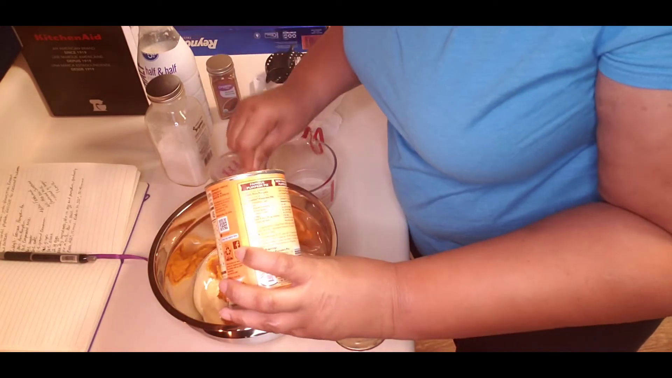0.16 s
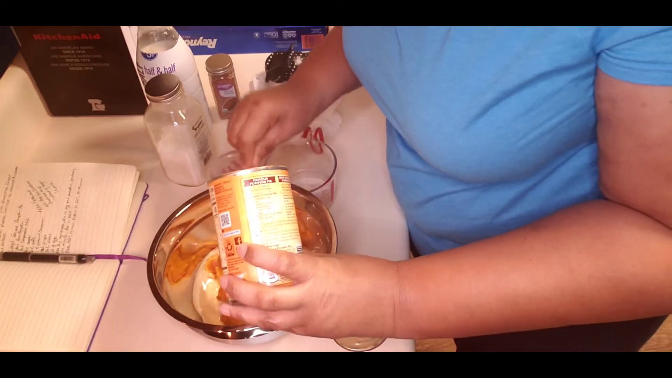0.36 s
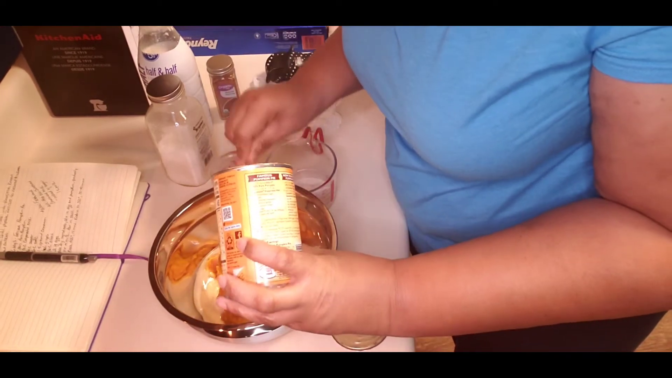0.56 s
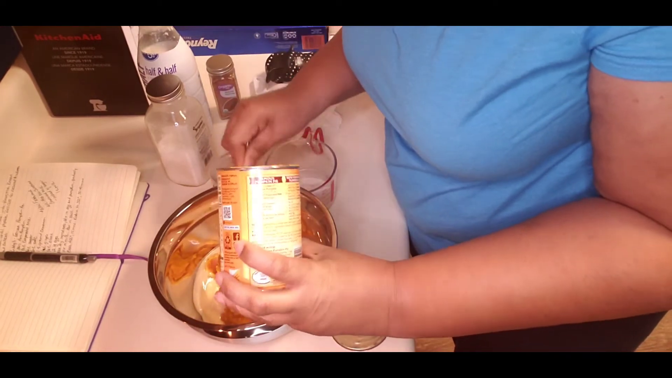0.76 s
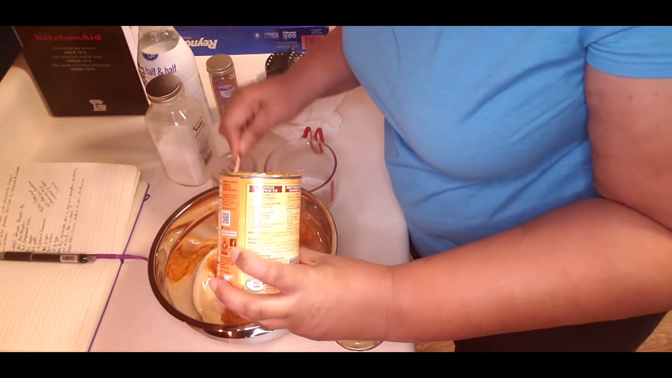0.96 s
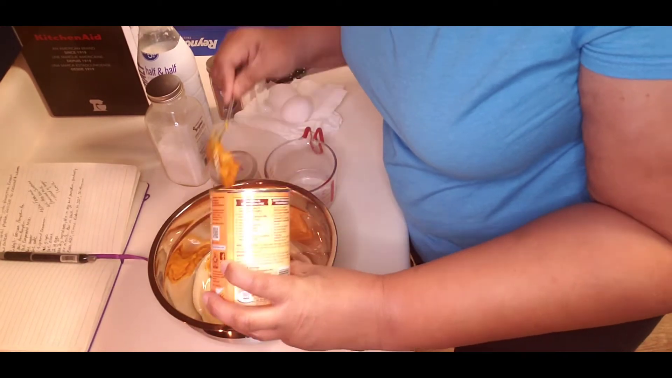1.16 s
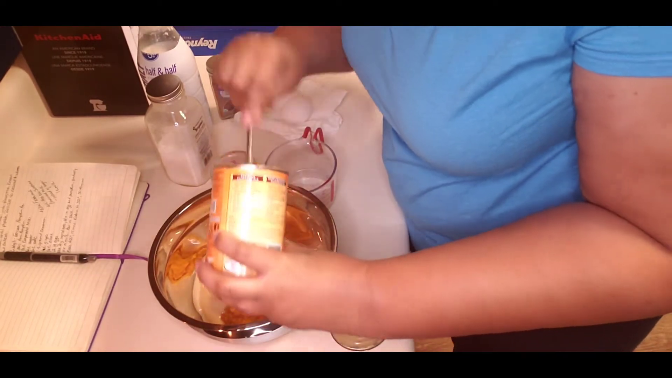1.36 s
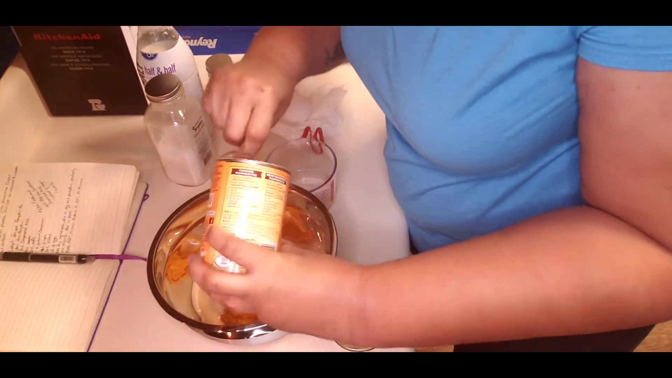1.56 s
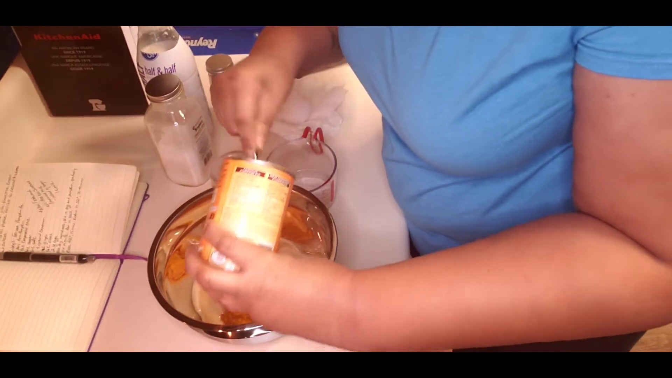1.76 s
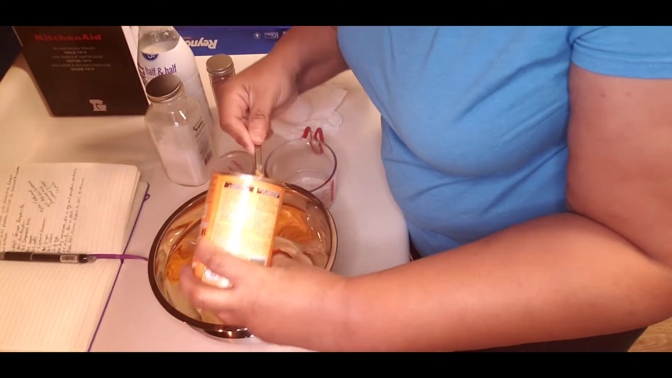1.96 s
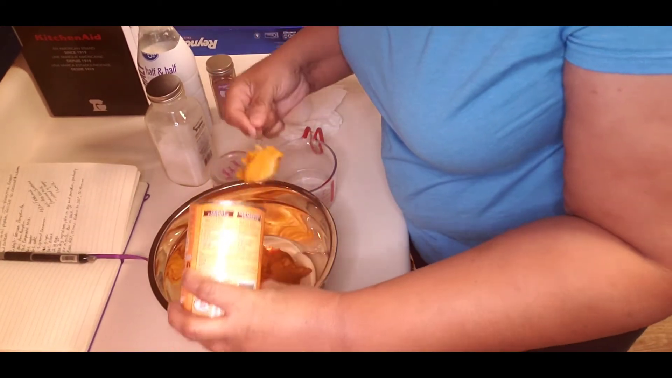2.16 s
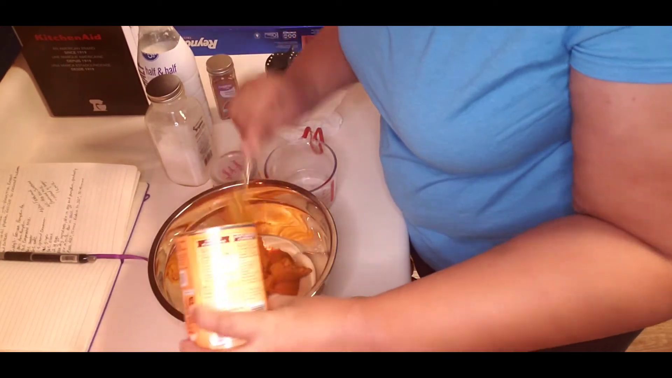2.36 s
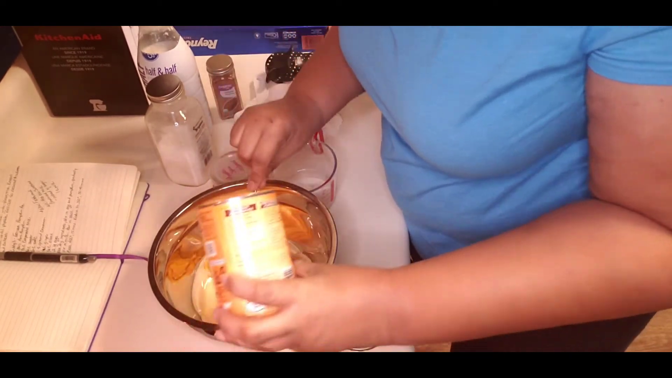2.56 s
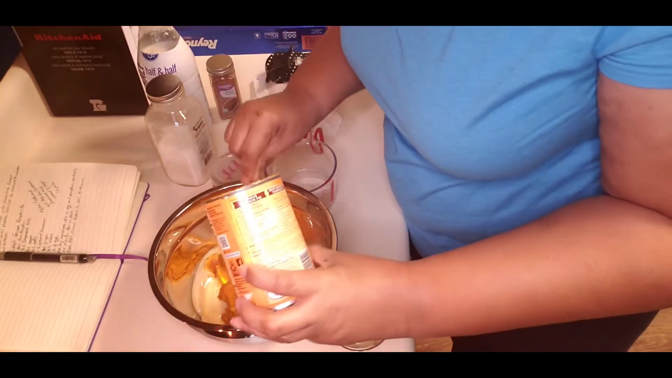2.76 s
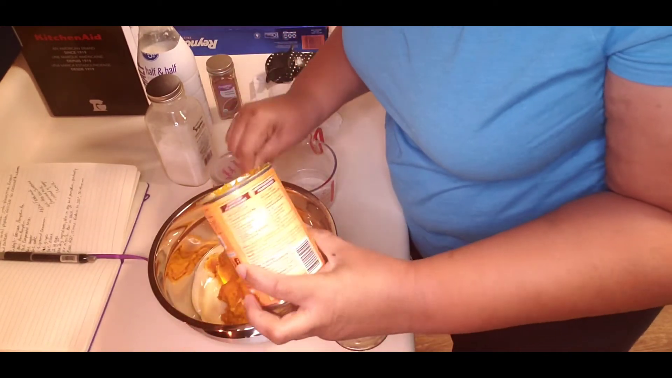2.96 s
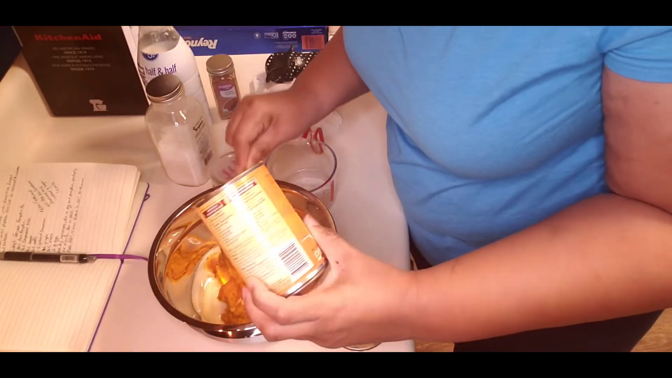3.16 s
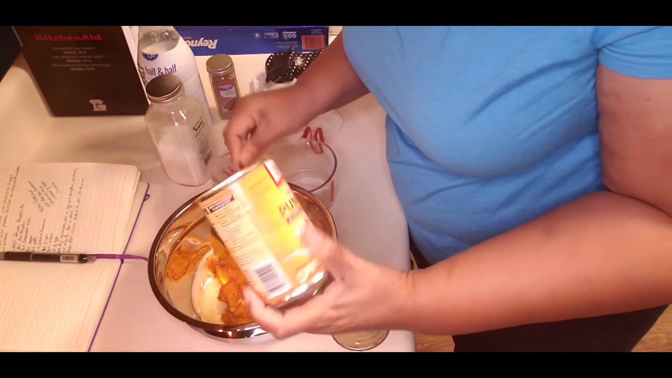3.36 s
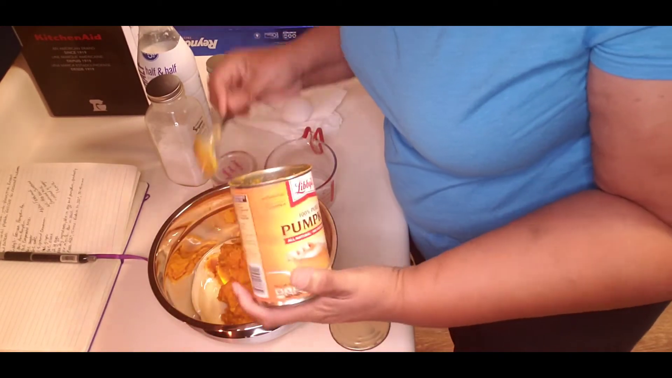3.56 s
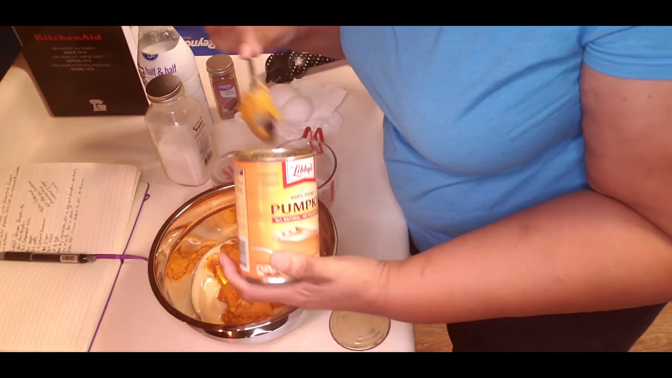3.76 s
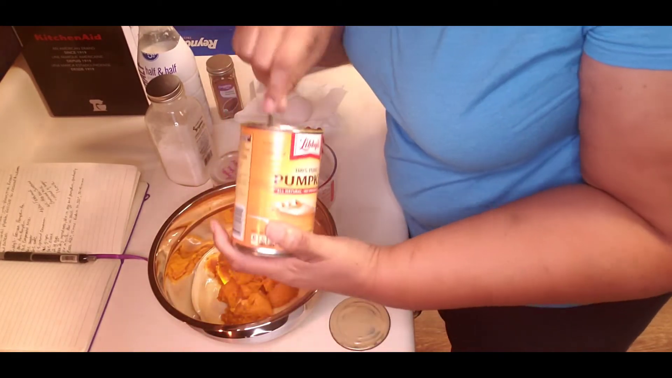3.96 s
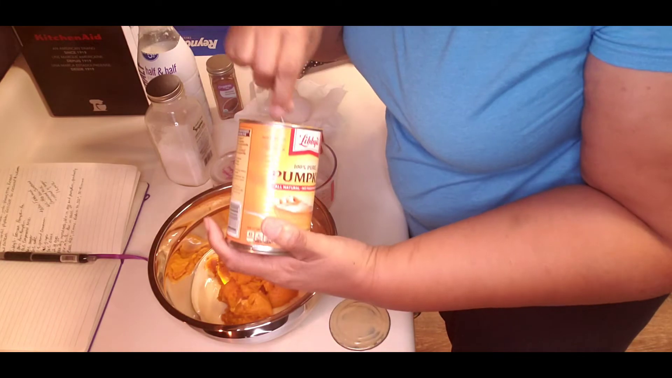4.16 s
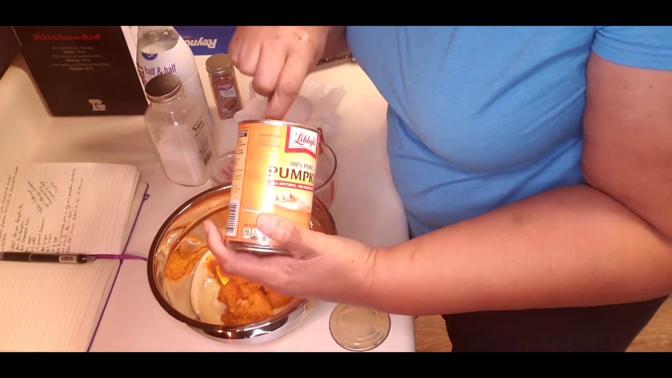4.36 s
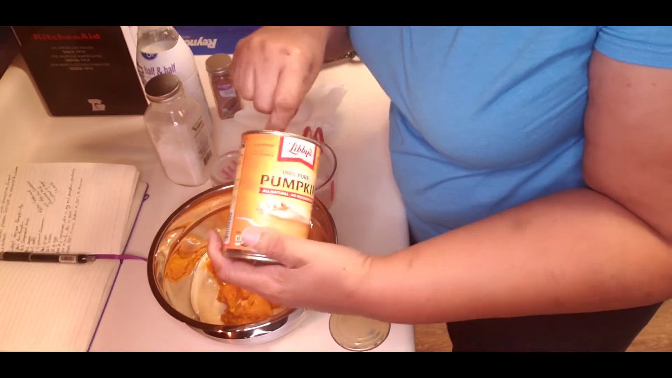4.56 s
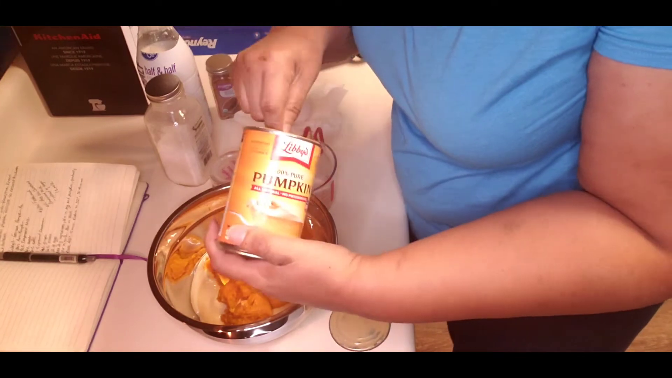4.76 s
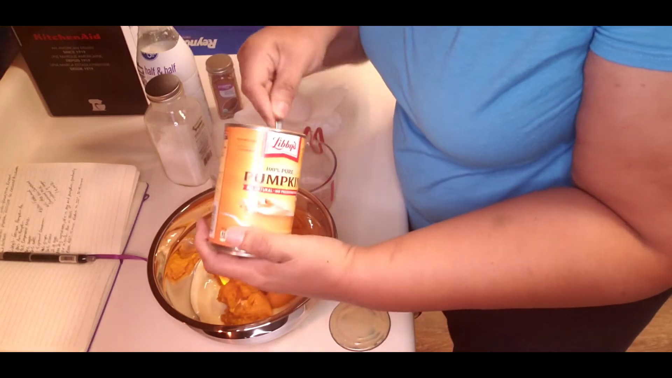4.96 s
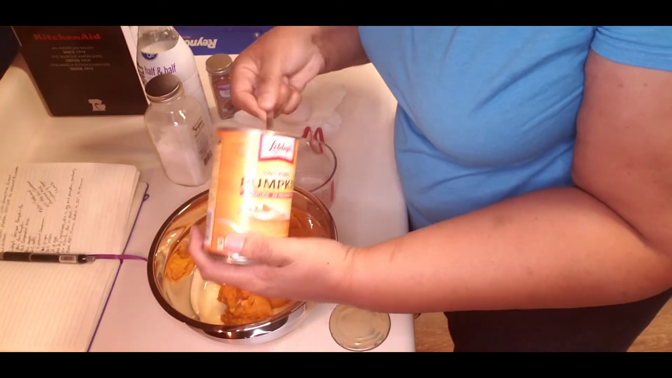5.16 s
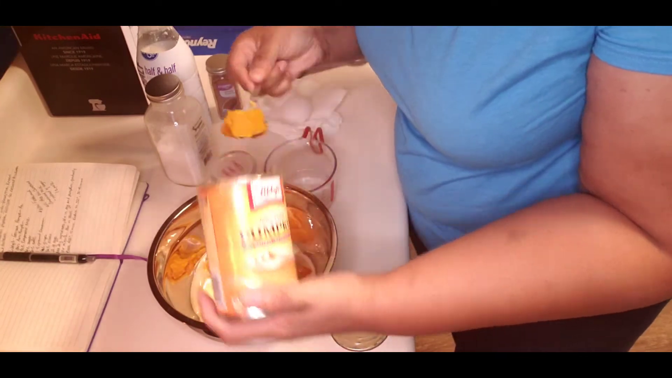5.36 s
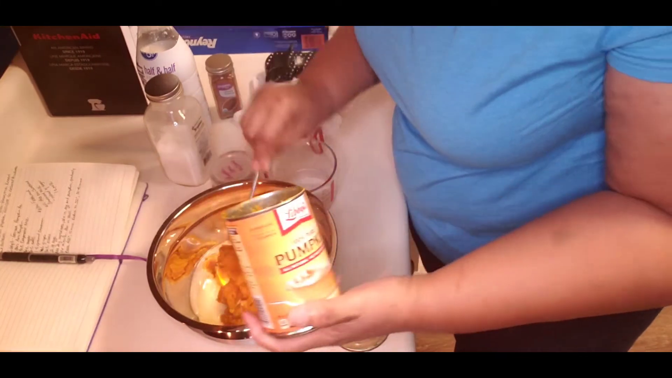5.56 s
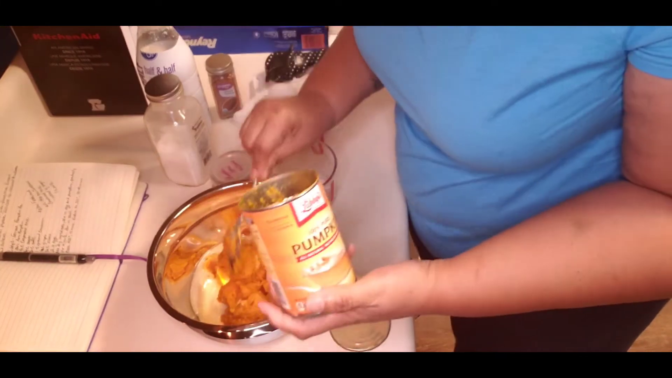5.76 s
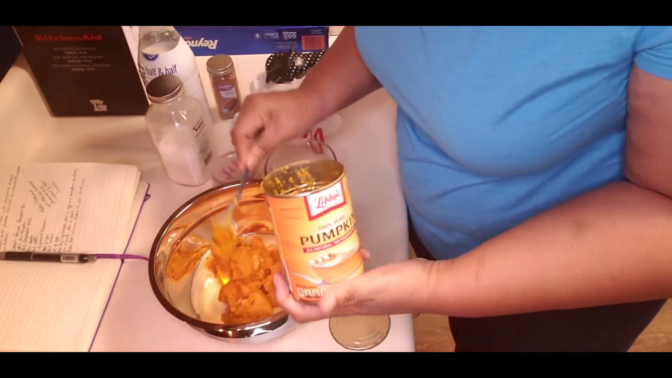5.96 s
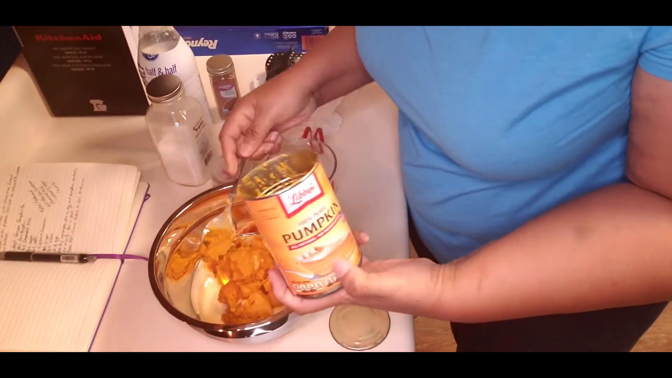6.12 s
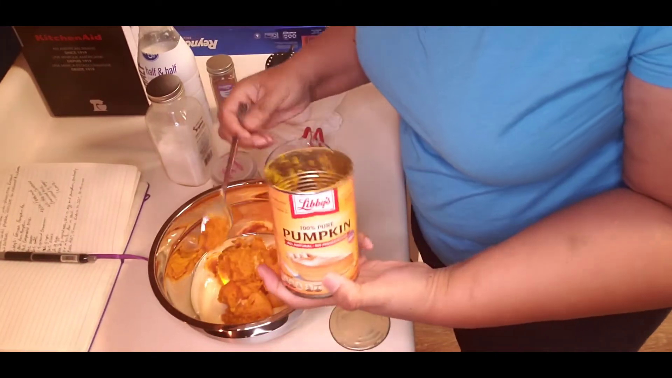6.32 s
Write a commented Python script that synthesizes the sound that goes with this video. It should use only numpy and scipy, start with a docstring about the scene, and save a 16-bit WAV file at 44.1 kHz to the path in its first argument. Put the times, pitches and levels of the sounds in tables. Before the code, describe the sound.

In a small kitchen, a low appliance hum throbs softly with faint sticky smacks. A metal spoon gives a brief run of hollow knocks in a tin can, then a soft rub. After a quiet gap come stronger clanks and scrapes, ending in one loud, rasping drag out of the can. Close microphone, left side louder, short room reflections.

```python
"""A throbbing appliance hum is heard first, with faint smacks of puree; then a metal spoon digs in a tin can.
Knocks are decaying noise bursts and wall modes, with a short hollow note from the air in the can.
Drags are stick-slip: random clicks filtered into a rasp, while the hollow note sinks as the mouth narrows.
Smacks are resonant crackles of pops. Echoes and a short diffuse tail place these sources in a small kitchen;
the hum is two sines beating against each other, with overtones, over a low rumble and hiss."""
import sys
import numpy as np
from scipy import signal
from scipy.fft import rfft, irfft, next_fast_len
from scipy.io import wavfile
from scipy.ndimage import uniform_filter1d

SR = 44100
rng = np.random.default_rng(int(sys.argv[2]) if len(sys.argv) > 2 else 0)


def store_pcm(level_fs):
    """Save levels as 16-bit WAV."""
    pcm = np.round(np.clip(level_fs, -1, 1) * 32767).astype(np.int16)
    wavfile.write(sys.argv[1], SR, np.atleast_2d(pcm).T)


N = 286209
TIME = np.arange(N) / SR  # s

# spoon strikes the can: [t/s, strength/dB, depth (0 rim to 1 bottom), hollow note f/Hz, push/s, chatter t60/s,
#   tick level/dB re strength before the fizz trim, wall ring f/Hz, ring level/dB re strength]
SPOON_KNOCKS = [ (1.542, -45, 0.97, 729, .024, 0.16, 1, 950, 6.5),
                (1.602, -48.5, 0.12, 634, 0.06, 0.18, 3.5, 420, -1.5),
                (1.652, -44.5, 0.85, 740, 0.022, .06, -4, 3050, -4),
                (1.707, -40.5, 0.6, 682, 0.014, 0.038, -5.5, 1467, -4.5),
                (1.925, -65.5, 1, 640, .028, 0.04, -21.5, 1890, -22.5),
                (2.125, -58.5, 0.33, 616, .012, .06, -8, 490, 7.5),
                (2.18, -61, 0, 700, 0.018, 0.081, -4.5, 4380, -3.5),
                (3.992, -56.5, 0.14, 640, 0.014, 0.15, 3, 1450, -16.5),
                (4.1027, -36, 0.83, 711, .012, 0.035, 1, 3463, -3),
                (4.166, -46.5, 0.94, 657, 0.011, 0.073, -5.5, 1910, -4),
                (4.3508, -43.5, 0.78, 716, .012, 0.11, -2.5, 1137, 4),
                (4.409, -40.5, 0.22, 664, 0.015, 0.048, 0.5, 926, -4),
                (4.699, -36, .65, 676, 0.0077, 0.063, -12.5, 2010, 5.5),
                (4.719, -43, 1, 727, .014, .095, 0.5, 610, 9),
                (4.933, -74, 1, 668, 0.0062, 0.055, -11, 905, -21),
                (5.167, -52.5, 0.12, 636, 0.016, 0.048, 1.5, 1890, -17),
                (5.244, -53, 0.96, 593, 0.022, .07, -1, 1950, 6), ]
# air modes of the can: [multiple of the hollow note, relative level/dB]
AIR_MODES = [(1, 5), (1.18, -7), (.85, -15.5)]
# a loaded spoon rises and narrows the mouth: [leaves the bottom t/s, reaches the mouth t/s, is clear of it t/s]
SPOON_LIFTS = [(1.764, 2.14, 2.18), (4.878, 5.304, 5.8)]


def amp(db):
    """Level to linear amplitude: 20 dB is a factor of ten."""
    return 10 ** (np.asarray(db) / 20)


def unit(x):
    """Normalization to an rms of 1."""
    return x / np.sqrt(np.mean(x ** 2) + 1e-20)


def blow(x):
    """Energy normalization: a short sound gets the energy of 30 ms at rms 1."""
    return unit(x) * np.sqrt(.03 * SR / x.shape[-1])


def read(points, hz):
    """Linear interpolation of a spectrum on a logarithmic frequency axis."""
    f, value = np.transpose(points)
    return np.interp(np.log(hz + 1), np.log(f + 1), value)


def add(mix, s, sound):
    """Superposition: adds a sound to the mix, in place, from time s."""
    part = mix[:, max(round(s * SR), 0):][:, :sound.shape[-1]]
    part += sound[..., :part.shape[1]]


def colour(x, points, size=4096):
    """Minimum-phase filtering: the Hilbert transform of the log gain supplies the causal phase."""
    log_gain = np.log(amp(read(points, abs(np.fft.fftfreq(size, 1 / SR)))))
    response = np.exp(np.conj(signal.hilbert(log_gain)))
    taps = np.fft.ifft(response).real[:size // 2]
    return signal.oaconvolve(x, taps[None], axes=1)[:, :x.shape[1]]


def pair(count, alike):
    """Two channels of white noise with a given correlation."""
    a, b = rng.standard_normal((2, count))
    c = np.clip(alike, -1, 1)
    return np.array([a, c * a + np.sqrt(1 - c * c) * b])


def resonate(x, hz, width):
    """Resonance by heterodyning: shift hz to zero, smooth with a one-pole low-pass, shift back."""
    turn = np.exp(2j * np.pi * np.cumsum(hz * np.ones(x.shape[-1])) / SR)
    r = np.exp(-np.pi * width / SR)
    return 2 * (turn * signal.lfilter([1 - r], [1, -r], x / turn)).real


def fade(t, t60):
    """Exponential decay of amplitude by 60 dB in t60 seconds, at least 2 ms."""
    return np.exp(-np.log(1000) * t / max(t60, .002))


def knocks(wall_db=-2, modes_db=-5, fizz_db=-2, ring_stretch=1.3, thud_t60=0.13, sizzle=.8, sizzle_t60=0.17,
           mode_width_hz=35, mode_spread=0.015, swell_s=0.0022, crack=0.6):
    """Impact excitation: each knock sets off a tick, wall chatter, a thud and the air resonance."""
    # thud into the hand: [multiple of the thud centre, relative level/dB]
    thud_shape = [(.15, -35.5), (.45, -9), (1, 0.5), (1.5, -1), (2.502, -10), (4.998, -37)]
    # wall chatter spectrum: [f/Hz, relative level/dB]
    chatter_colour = [(400, -12), (900, -14.5), (1400, 5.5), (2000, 0), (3200, -0.5), (4000, -5),
                      (5300, -6.5), (7000, -27), (10000, -15.5)]
    # bright tick spectrum: [f/Hz, relative level/dB]
    tick_colour = [(3000, -35.5), (6000, -11.5), (7400, -12), (8700, -4.5), (11500, 0.5), (13500, -4),
                   (15000, -9.5)]
    thud_centre_hz = 335
    # a deep knock drives the air, one at the rim mostly jolts the hand: dB re strength (rim, bottom)
    hollow_db, thud_db = (-4.5, 15.5), (2.5, -11.5)

    out, t = np.zeros((2, N)), np.arange(SR // 5) / SR
    thud_colour = [(k * thud_centre_hz, db) for k, db in thud_shape]
    for s, db, depth, hz, push_s, chatter_t60, tick_db, ring_hz, ring_db in SPOON_KNOCKS:
        # the note swells, holds while the spoon pushes, then the puree chokes it
        push = (1 - np.exp(-t / swell_s)) * np.exp(-(t / push_s) ** 3)
        note = sum(amp(mode_db) * np.sin(2 * np.pi * hz * k * t) for k, mode_db in AIR_MODES)
        air = blow(note * push)

        contact = fade(t, chatter_t60) + crack * fade(t, .012)
        chatter = blow(colour(pair(len(t), 0.35) * contact, chatter_colour))
        metal = amp(wall_db) * chatter + amp(modes_db) * blow(tin(t))
        judder = pair(len(t), 1.0) * (fade(t, ring_stretch * chatter_t60) + crack * fade(t, 0.0025))
        ring = resonate(judder, ring_hz, mode_width_hz + mode_spread * ring_hz)
        metal += amp(ring_db) * blow(ring)

        # a sharp tick, then wet puree sizzles briefly
        fizz = contact + sizzle * fade(t, sizzle_t60) + 0.6 * fade(t, 0.0036)
        tick = amp(tick_db + fizz_db) * blow(colour(pair(len(t), 0.039) * fizz, tick_colour))
        thud = blow(colour(pair(len(t), 0.91) * fade(t, thud_t60), thud_colour))
        driven = by_depth(hollow_db, depth) * air + by_depth(thud_db, depth) * thud
        add(out, s, amp(db) * (metal + tick + driven))
    return out


def tin(t, spread_db=3, waver=0.74):
    """Modal superposition: damped wall modes, weighted anew per contact point, unsteady in the grip."""
    # tin wall modes: [f/Hz, mean relative level/dB, t60/s]
    wall_modes = [(980, -5.5, 0.039), (1180, -8, 0.11), (1450, -3, 0.16), (1875, -2, 0.093),
                  (2015, -16, 0.5), (2219, -3.5, 0.023), (2442, 0, .1), (2854, -3.5, .14),
                  (3050, -16, 0.083), (3210, 0.5, 0.08), (3600, -5.5, .1), (4450, -9.5, 0.18)]
    hz, db, t60 = np.transpose(wall_modes)[:, :, None]
    polarity = rng.choice([-1, 1], (len(hz), 1))
    weight = amp(db + spread_db * rng.standard_normal((2, len(hz), 1))) * polarity
    # the phase of each mode wanders as a random walk
    drift = waver * np.cumsum(rng.standard_normal((len(hz), len(t))), 1) / np.sqrt(0.0011 * SR)
    decay = np.exp(-np.log(1000) * t / t60)
    return (weight * np.sin(2 * np.pi * hz * t + drift) * decay).sum(1)


def by_depth(span_db, depth):
    """Position-dependent coupling: gain interpolated in dB from rim to bottom."""
    rim, bottom = span_db
    return amp(rim + (bottom - rim) * depth)


def drags(hollow_db=-4, rasp_db=-3, ring_db=-16, width_hz=40, slips_per_s=1800, grit=0.55,
          catch_db=2.5, band_catch_db=3):
    """Stick-slip friction: random clicks and grit rasp and ring the wall; noise sounds the air modes."""
    # rasp spectrum: [f/Hz, relative level/dB]
    rasp_colour = [(60, -22), (150, -1.5), (450, 10), (1000, 1), (1500, -4.5), (2000, -3.5), (3000, -5),
                   (5000, -6), (7300, -14.5), (9000, -7), (12000, -6.5), (15000, -13)]
    # broad wall resonances under the rasp: [f/Hz, width/Hz, relative level/dB]
    rasp_peaks = [(920, 92, 3.5), (1950, 74, -0.5), (2950, 100, -5.5), (4770, 78, -2.5)]
    # rubbing near the rim shakes the can in the hand: [f/Hz, width/Hz, level/dB re the rasp at full narrowing]
    rim_modes = [(151, 120, -10.5), (475, 30, -3)]
    open_hz, narrowed_hz = 712.4, 596.4  # the hollow note with the mouth open and narrowed

    out, (rasp, hollow) = np.zeros((2, N)), rubbing()
    touching = np.flatnonzero(rasp + hollow > amp(-95))
    rasp, hollow, narrow = rasp[touching], hollow[touching], narrowing()[touching]
    count = len(touching)
    slips = rng.random(count) < slips_per_s / SR
    drive = unit(slips * pair(count, 0.32)) + grit * pair(count, 0.48)

    hz = open_hz + (narrowed_hz - open_hz) * narrow
    air = 0
    for k, db in AIR_MODES:
        mode = resonate(rng.standard_normal(count), k * hz, width_hz)
        air = air + amp(db) * resonate(mode, k * hz, 4 * width_hz)
    air /= np.sqrt(uniform_filter1d(air ** 2, size=700) + 1e-15)  # steady pressure evens out the note

    size = next_fast_len(count, True)
    scratch = colour(drive, rasp_colour)
    scratch += sum(amp(db) * resonate(drive, f, width) for f, width, db in rasp_peaks)
    spectrum = rfft(scratch, size)
    # each frequency band flutters on its own
    band = np.digitize(np.fft.rfftfreq(size, 1 / SR), [1400, 2400, 3800, 7000, 10500])
    scratch = sum(irfft(spectrum * (band == k), size)[:, :count] * flutter(count, band_catch_db)
                  for k in np.unique(band))

    ring = signal.oaconvolve(drive, tin(np.arange(SR // 4) / SR), axes=1)[:, :count]
    rim = sum(amp(db) * unit(resonate(resonate(drive.sum(0), f, width), f, 3 * width))
              for f, width, db in rim_modes)
    metal = amp(rasp_db) * (unit(scratch) + narrow ** 2 * rim) + amp(ring_db) * unit(ring)
    out[:, touching] = amp(hollow_db) * hollow * air * flutter(count, catch_db) + rasp * metal
    return out


def rubbing():
    """Incoherent power addition: strokes, lifts and skids sum into gains of rasp and hollow note."""
    # strokes swell and ease off: [crest t/s, rise/s, fall/s, rasp level/dB, hollow note level/dB],
    # both levels before the overall trims of the drags
    strokes = [ (1.891, 0.074, 0.087, -57.5, -42.5), (2.045, .03, .04, -78, -46.5),
               (2.112, .08, 0.11, -51, -44), (2.195, .02, 0.037, -50.5, -57),
               (4.041, 0.065, 0.2, -55, -58.5), (4.162, 0.034, 0.056, -42.5, -39),
               (4.395, .04, .03, -51.5, -42), (4.685, 0.079, .08, -52, -34), (5.11, 0.1, 0.15, -59.5, -43),
               (5.282, 0.066, 0.06, -31.5, -28), ]
    edge_db, curve = -21, 2.04  # level one rise or fall away from the crest; roundness of the crest
    lift_hollow_db = -57.5  # the rising spoon keeps the note softly alive; before the same trims
    # after a knock the spoon skids on: dB re the strength, before the same trims, and decay time
    skid_rasp_db, skid_hollow_db, skid_t60_s = -8.5, -2, .28

    rasp, hollow = np.zeros((2, N))
    for crest, rise, fall, rasp_db, hollow_db in strokes:
        away = np.maximum((crest - TIME) / rise, (TIME - crest) / fall)
        force = amp(edge_db * np.minimum(away, 10) ** curve)
        rasp += (amp(rasp_db) * force) ** 2
        hollow += (amp(hollow_db) * force) ** 2
    for leaves, arrives, _ in SPOON_LIFTS:
        lifting = np.interp(TIME, [leaves, leaves + 0.024, arrives, arrives + 0.024], [0, 1, 1, 0])
        hollow += amp(lift_hollow_db) ** 2 * lifting
    skid_power = np.zeros((1, N))
    decay = fade(np.arange(SR // 3) / SR, skid_t60_s)
    for s, db, *_ in SPOON_KNOCKS:
        add(skid_power, s, (amp(db) * decay) ** 2)
    rasp += amp(skid_rasp_db) ** 2 * skid_power[0]
    hollow += amp(skid_hollow_db) ** 2 * skid_power[0]
    return np.sqrt(rasp), np.sqrt(hollow)


def narrowing():
    """Resonator aperture: how far the loaded spoon closes the can's mouth, 0 to 1."""
    sink_curve = 1.05
    return sum(np.interp(TIME, times, [0, 1, 0]) for times in SPOON_LIFTS) ** sink_curve


def flutter(count, depth_db):
    """Random amplitude modulation: the contact catches and lets go over several milliseconds."""
    smooth = uniform_filter1d(uniform_filter1d(rng.standard_normal(count), size=260), size=130)
    return amp(depth_db * unit(smooth))


def smacks(level_db=-13, pops_per_s=900, width_hz=4000, count=9):
    """Adhesive release: puree lets go of metal in a resonant crackle of pops; faint ones come at random."""
    # sticky smacks: [t/s, level/dB before the overall trim, t60/s]
    sticky = [(.078, -61.5, 0.26), (0.596, -59.5, 0.39), (2.508, -63.5, 0.13), (2.568, -61, 0.13),
              (2.718, -59.5, 0.26), (2.884, -62, .18), (2.992, -64.5, .13), (4.887, -56, 0.17),
              (5.666, -58.5, 0.49), (6.201, -59, 0.38)]
    smack_hz = 12080
    faint_db, faint_t60_s = -66, 0.09  # the level is before the overall trim

    out, t = np.zeros((2, N)), np.arange(SR // 4) / SR
    faint = [(s, faint_db, faint_t60_s) for s in rng.random(count) * N / SR]
    for s, db, t60 in sticky + faint:
        crackle = 0.14 + (rng.random(len(t)) < pops_per_s / SR)
        pops = pair(len(t), 0.043) * crackle * fade(t, t60)
        add(out, s, amp(db + level_db) * blow(resonate(pops, smack_hz, width_hz)))
    return out


def kitchen(x, wet_db=-8, low_wet_db=-4):
    """Room impulse response: direct sound, near reflections and a diffuse tail weaker in the bass."""
    # reflections from the worktop and nearby things: [delay t/s, left gain, right gain]
    echoes = [(.0056, 0.081, 0.17), (.0083, 0.26, 0.09), (.0125, 0.075, 0.12)]
    # reverberation time: [f/Hz, t60/s]
    room_t60 = [(150, 0.6), (700, .27), (2000, 0.32), (5000, 0.32), (12000, 0.22)]

    hz, t, z = signal.stft(rng.standard_normal((2, SR // 2)), SR, nperseg=256)
    z *= np.exp(-np.log(1000) * t / read(room_t60, hz)[:, None])
    z *= amp(read([(800, low_wet_db), (2000, 0.0025)], hz))[:, None]
    tail = signal.istft(z, SR, nperseg=256)[1]
    tail *= np.clip(np.arange(tail.shape[1]) / SR / 0.0034, 0, 1) ** 2  # onset over 3.4 ms
    tail *= amp(wet_db) / np.linalg.norm(tail[0])
    tail[:, 0] += 1  # direct sound
    for delay, left, right in echoes:
        add(tail, delay, np.array([[left], [right]]) * signal.windows.hann(9) / 4)
    return signal.oaconvolve(x, tail, axes=1)[:, :N]


def background():
    """Beating: two motors of nearly equal pitch throb together over a low rumble and microphone hiss."""
    # overtones of the stronger motor: [multiple of the hum, rms level/dB]
    overtones = [(4, -73.5), (5, -76), (6, -79)]
    # rumble spectrum: [f/Hz, relative level/dB]
    rumble_colour = [(20, -10.5), (45, -10.5), (85, -6), (125, -2), (190, -0.5), (300, -3), (390, -4.5),
                     (480, -11.5), (600, -23), (1000, -43.5), (3000, -60)]
    # hiss spectrum: [f/Hz, relative level/dB]
    hiss_colour = [(400, -25), (700, 2.5), (1050, -3.5), (1780, -5.5), (2110, -0.5), (2450, -6), (4300, -8),
                   (8000, -20), (10500, -8.5), (13900, -5), (15000, -20.5)]
    rumble_db, hiss_db = -68, -80  # rms
    # the stronger motor swells and sinks slowly: rms level at mid-swell, depth as a share of amplitude
    hum_hz, hum_db, swell_depth, swell_period_s, swell_crest_s = 59.2, -64.5, 0.63, 3.1, 2.8
    # the second motor turns a little slower: beat rate, time of one beat crest, rms level
    beat_hz, beat_crest_s, second_motor_db = 3.215, .09, -70.5

    turn = 2 * np.pi * hum_hz * TIME
    swell = 1 + swell_depth * np.cos(2 * np.pi * (TIME - swell_crest_s) / swell_period_s)
    hum = amp(hum_db) * swell * np.sin(turn)
    hum += amp(second_motor_db) * np.sin(turn - 2 * np.pi * beat_hz * (TIME - beat_crest_s))
    buzz = sum(amp(db) * np.sin(round(k) * turn + 2 * np.pi * rng.random()) for k, db in overtones)
    rumble = amp(rumble_db) * unit(colour(pair(N, .95), rumble_colour))
    hiss = amp(hiss_db) * unit(colour(pair(N, 0.067), hiss_colour))
    return np.sqrt(2) * (hum + buzz) + rumble + hiss  # sqrt(2): rms to peak of a sine


def scene():
    """Linear superposition: spoon, can and puree excite the room; the background is added directly."""
    return kitchen(knocks() + drags() + smacks()) + background()


def record(dry):
    """Channel level difference and band limit: the left microphone is louder, the top treble is cut."""
    # channel balance: [f/Hz, left minus right level/dB]
    balance = [(60, 6.5), (200, 10.5), (700, 4.5), (1400, 5.5), (2500, 7.5), (5000, 7), (9000, 7.5),
               (14000, 0.5)]
    edge_hz = 14750
    half_db = read(balance, np.fft.rfftfreq(N, 1 / SR)) / 2
    heard = irfft(rfft(dry) * amp([half_db, -half_db]), N)
    low_pass = signal.firwin(301, edge_hz, window=("kaiser", 8), fs=SR)
    return signal.oaconvolve(heard, low_pass[None], "same")


dry = scene()
out = record(dry)
store_pcm(out)
```